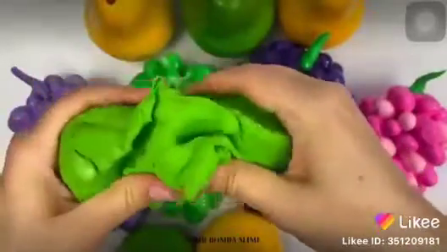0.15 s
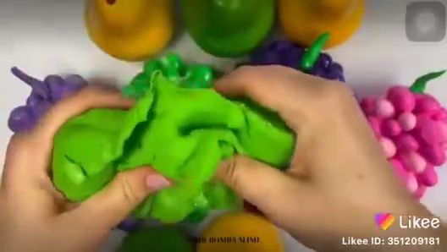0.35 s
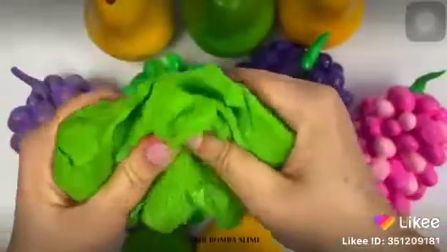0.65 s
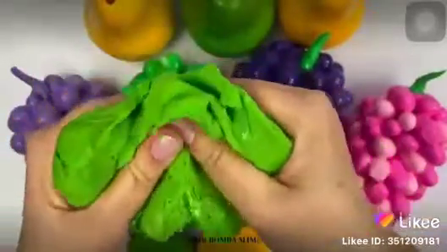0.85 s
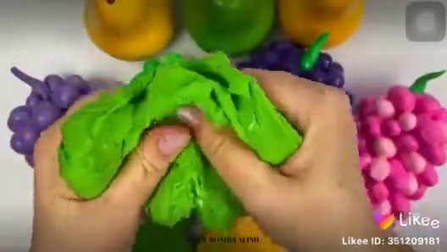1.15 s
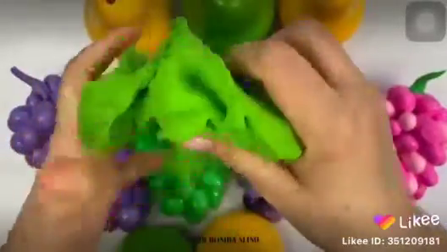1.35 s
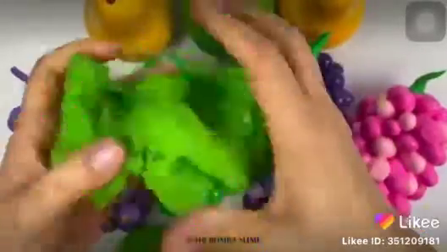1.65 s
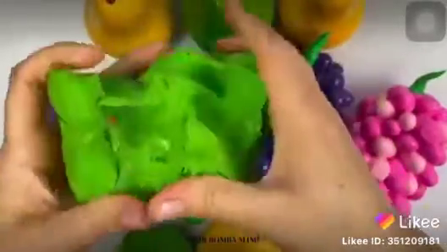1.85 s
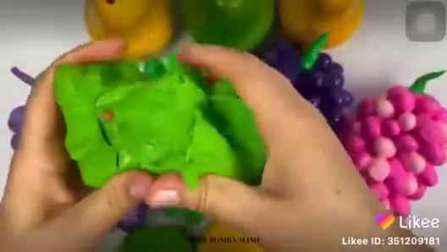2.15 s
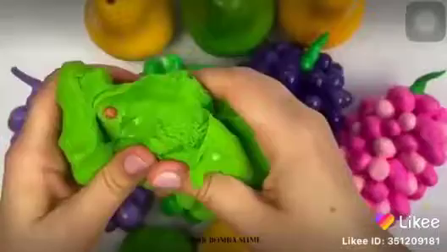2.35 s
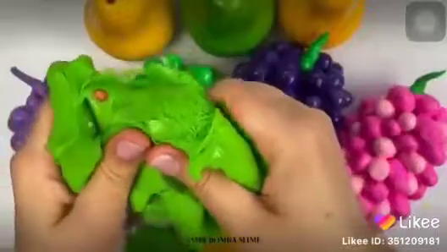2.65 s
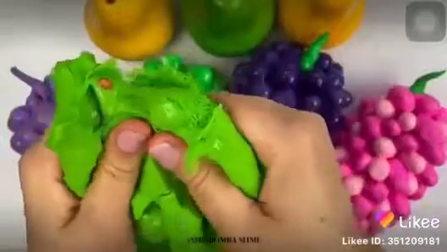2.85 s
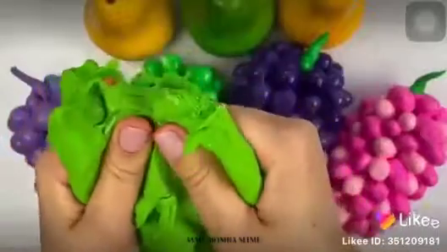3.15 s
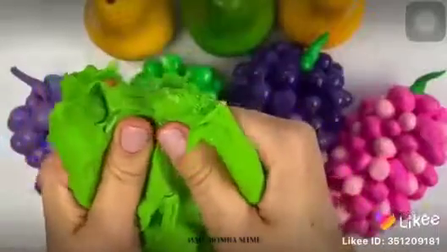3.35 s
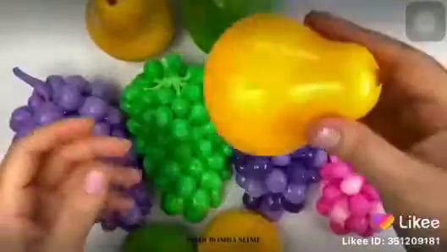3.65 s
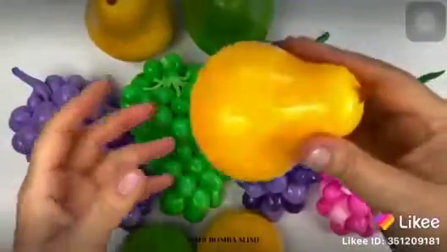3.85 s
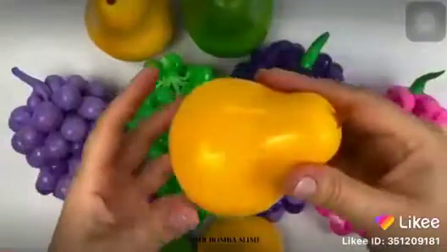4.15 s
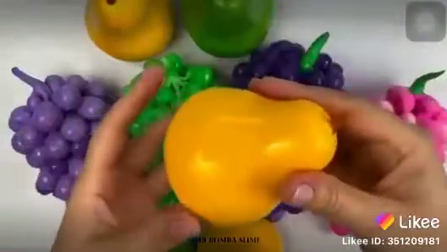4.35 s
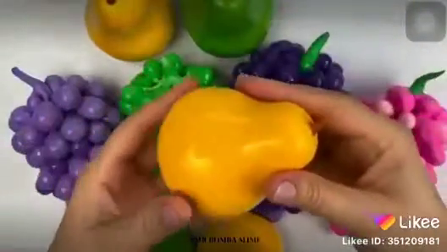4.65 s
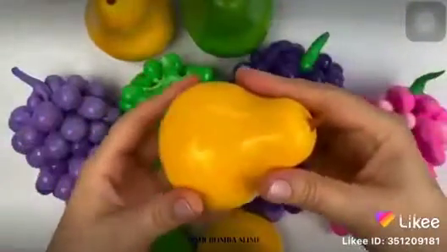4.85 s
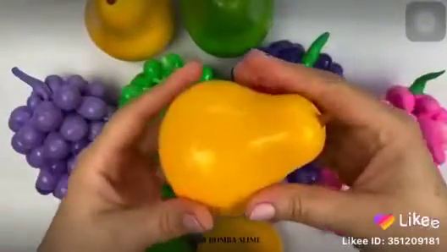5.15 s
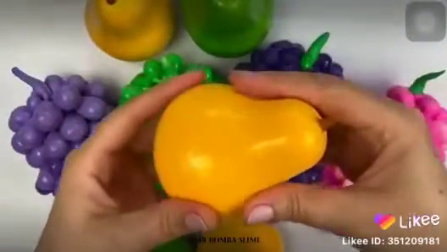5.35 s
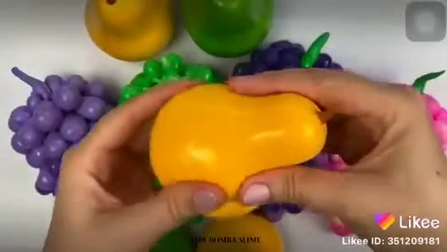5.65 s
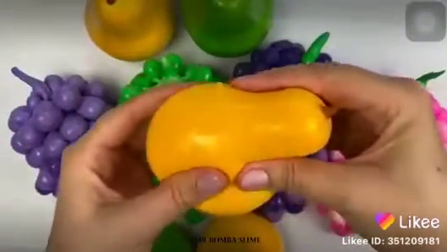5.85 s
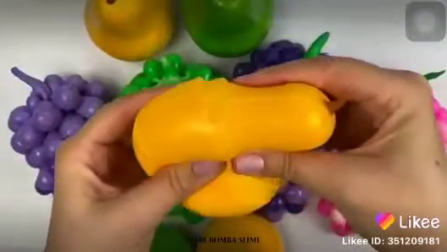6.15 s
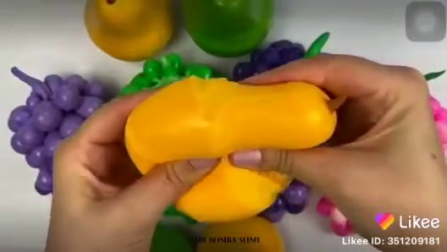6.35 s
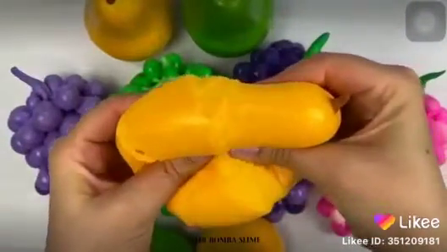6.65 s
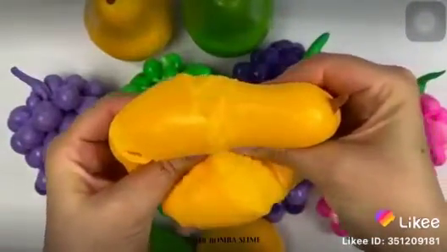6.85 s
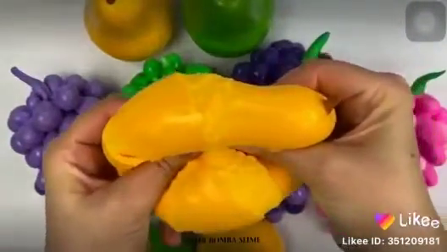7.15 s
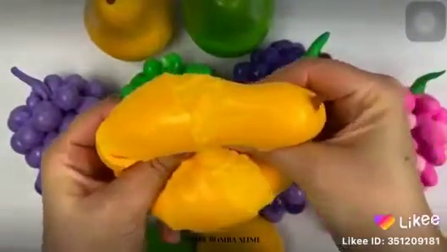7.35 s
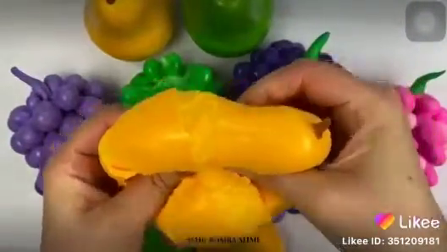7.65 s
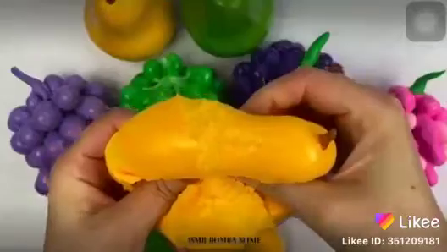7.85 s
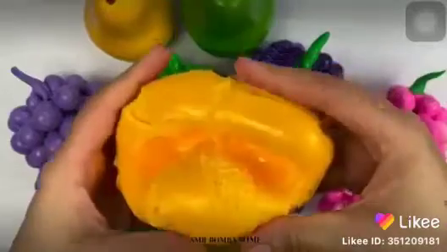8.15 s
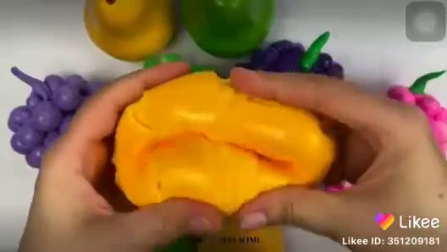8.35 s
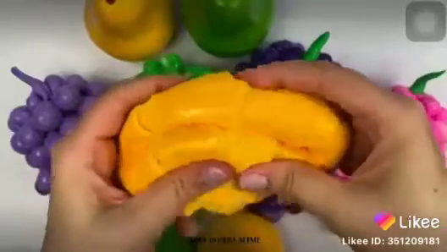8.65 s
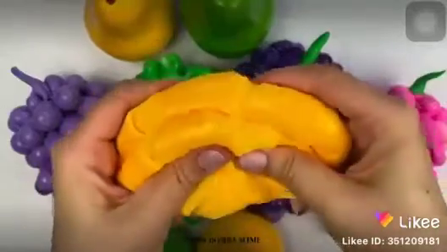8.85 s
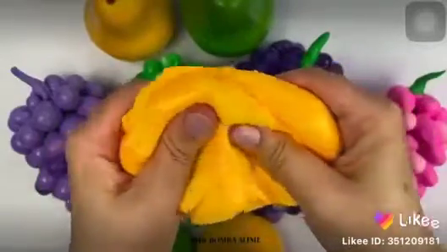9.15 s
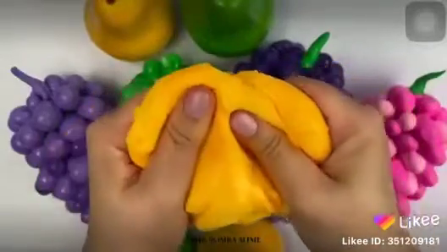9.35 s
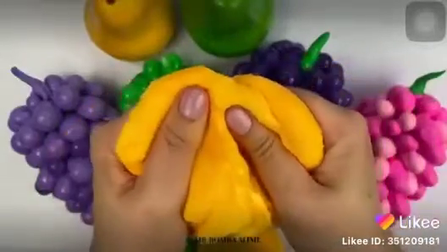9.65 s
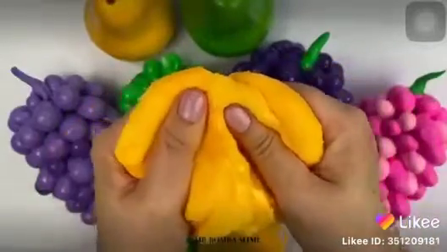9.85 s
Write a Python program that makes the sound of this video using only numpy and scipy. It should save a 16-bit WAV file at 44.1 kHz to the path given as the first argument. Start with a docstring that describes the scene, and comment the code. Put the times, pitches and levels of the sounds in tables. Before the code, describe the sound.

Crisp crust fractures, bright and dry, pop in irregular clusters over gritty rustling as fingers press into clay. Two early bursts are separated by dull regripping; then over two seconds of near silence with only room noise and faint low pulses. The loudest crunching follows, slightly clipped, then sparse ticks, then a last heavy crackling run that fades. Close, dry, indoor phone pickup.

```python
"""Hands squeeze soft clay under a hard, brittle crust, close to a phone microphone in a quiet room.
Two bursts of crust snaps over fine crackle come first, with bass rumble and soft bumps of handling.
From 3.3 s comes a lull as a new shape is fetched; from 5.6 s its snaps are loudest and overload the input.
A last burst from 8.2 s has two low clay groans. Low swells of alternating sign come in three runs; faint
room noise lies under it all. Snaps and crackle are noise bursts driving resonant modes."""
import sys
import numpy as np
from scipy import signal
from scipy.fft import rfft, irfft
from scipy.io import wavfile
from scipy.ndimage import uniform_filter1d

SR = 44100
rng = np.random.default_rng(int(sys.argv[2]) if len(sys.argv) > 2 else 0)


def store_pcm(level_fs):
    """Save levels as 16-bit WAV."""
    pcm = np.round(np.clip(level_fs, -1, 1) * 32767).astype(np.int16)
    wavfile.write(sys.argv[1], SR, np.atleast_2d(pcm).T)


N = 441000


def amp(db):
    """dB to gain."""
    return 10 ** (np.asarray(db) / 20)


def rms_one(x):
    """Scale to rms 1."""
    return x / np.sqrt(np.mean(x ** 2) + 1e-20)


def ring(x, hz, t60_s):
    """Two-pole resonator: a unit click rings as a decaying sine of height 1."""
    radius = amp(-60 / (t60_s * SR))
    w = 2 * np.pi * hz / SR
    return signal.lfilter([0, np.sin(w)], [1, -2 * radius * np.cos(w), radius ** 2], x + 1e-18)


def band(x, low_hz, high_hz):
    """Butterworth band-pass."""
    sos = signal.butter(2, [low_hz, high_hz], "band", fs=SR, output="sos")
    return signal.sosfilt(sos, x)


def drift(rate_hz):
    """Slow random wander of rms 1: noise through two equal low-pass poles."""
    pole = np.exp(-2 * np.pi * rate_hz / SR)
    noise = rng.standard_normal(N + SR)
    settled = signal.lfilter([1], [1, -2 * pole, pole ** 2], noise)[SR:]
    return rms_one(settled)


NEW_SHAPE_S = 4.0   # lump before, hollow shape after
RUN_TAU_S = 0.0045


def strike(at, sizes, modes, spread_db, tear_s, run_on=0):
    """Each fracture is a decaying noise burst, may run on longer, and drives each mode by its own random gain."""
    out, t = np.zeros(N), np.arange(900) / SR
    tear, run = [np.exp(-t / tau_s) / np.sqrt(tau_s * SR / 2) for tau_s in (tear_s, RUN_TAU_S)]
    luck = rng.standard_normal((len(at), len(modes)))
    on_lump = at < NEW_SHAPE_S * SR
    for (hz, lump_db, hollow_db, t60_s), own in zip(modes, luck.T):
        size = sizes * amp(np.where(on_lump, lump_db, hollow_db) + spread_db * own)
        if hz < 800:   # only long cracks move the whole body
            size = size * np.minimum(run_on, 1) ** 0.48
        starts = np.zeros((2, N))
        np.add.at(starts, (slice(None), at), [size, size * run_on])
        push = signal.oaconvolve(starts, [tear, run], axes=1)[:, :N].sum(0)
        out += ring(push * rng.standard_normal(N), hz, t60_s)
    return out


# crust fractures: [t/s, splinter drive level/dB, shell drive level/dB], relative to the modes
FRACTURES = [(0.0783, -18, -41), (0.105, -9, -33),  (0.1523, -26, -26), (0.191, -23.5, -40),
             (0.2031, -14.5, -36), (0.2452, -15.5, -21), (0.254, -4, -7), (0.2747, -13, -22),
              (0.3098, -17, -18), (0.3232, -10, -10.5), (0.345, -12.5, -17),  (0.361, -9, -16.5),
             (0.3733, -8.5, -12), (0.394, -12, -25), (0.3987, -3, -10), (0.413, -10, -36),
              (0.445, -22, -39), (0.4682, -17, -23.5),  (0.541, -11, -14.5),  (0.5536, -16, -40),
             (0.5693, -16.5, -19), (0.593, -11, -29),  (0.6213, 2.5, -18),  (0.6429, -17, -17.5),
             (0.6609, -12, -12), (0.6814, -16, -18.5), (0.7405, -25, -23), (0.755, -29, -37),
             (0.786, -30, -26), (0.796, -21, -37), (0.8157, -21.5, -45),  (0.8387, -28, -26.5),
             (0.8748, -20.5, -16.5), (0.905, -15.5, -41),  (0.9255, -23.5, -29), (0.9642, -22, -23),
              (0.988, -29, -45), (1.0032, -11.5, -23.5), (1.055, -27, -31), (1.219, -16.5, -23),
             (1.257, -40, -26), (1.268, -32, -11), (1.2738, -39, -10.5), (1.2953, -42, -18.5),
             (1.5409, -46, -25), (1.741, -26.5, -37), (1.829, -42, -29.5), (1.996, -44, -38),
             (2.018, -38, -31), (2.054, -31, -28), (2.067, -33, -22), (2.17, -27.5, -36),
             (2.2826, -25.5, -36), (2.3115, -3, -18), (2.3449, -19.5, -39), (2.4076, -19.5, -49),
             (2.43, -22, -40), (2.4545, -12, -29), (2.5032, -25, -45), (2.509, -18.5, -42),
             (2.5356, -14, -30), (2.5682, -9, -20), (2.592, -9, -22), (2.6216, -9, -9.5),
              (2.6805, -12, -21),  (2.6989, -8, -14), (2.7415, -21, -32), (2.7758, -13, -14),
             (2.7911, -19, -23), (2.9022, -16, -23), (2.922, -13, -20),  (2.9345, -22, -39),
             (2.9705, -8.5, -12), (2.9999, -20.5, -24), (3.0444, -14, -20.5), (3.0514, -22, -17),
             (3.0686, -17.5, -36), (3.112, -20, -22.5), (3.121, -23, -37), (3.175, -18, -21.5),
              (3.1873, -26, -32), (3.2615, -35, -28.5), (4.24, -48, -60), (4.3975, -44, -38.5),
             (4.713, -53, -38.5), (4.903, -35, -39), (4.9189, -36, -34), (4.987, -66, -41),
             (5.6247, -17, -40), (5.6686, 0, 1.5), (5.6935, 0, -46), (5.7101, -4, 11.5), (5.7237, 3, -14),
             (5.7299, 0, 1), (5.7468, -7, -1.5), (5.7518, 2.5, -22), (5.7758, -10, -13),
             (5.7979, -4.5, -7.5),  (5.825, -6, -6.5), (5.8459, -7, -3.5),  (5.859, -0.5, -5),
             (5.874, -6, -9), (5.8995, -9, -12), (5.921, -5, -9.5), (5.9327, -3, -11), (5.95, -2, -11.5),
             (5.963, -2, -3), (5.9772, 2, -2.5), (5.9955, 6, -29), (6.0106, 0, -3.5), (6.07, -9, -10),
             (6.0792, -2.5, -5), (6.096, -1, -14.5),  (6.1356, -17, -11), (6.144, 2, -9.5),
             (6.1822, -5, -5.5), (6.194, 1.5, -4),  (6.248, -4.5, -8), (6.2632, -3.5, -5.5),
             (6.2839, -2, -6.5),  (6.3237, -9, -9), (6.3557, -8, -8.5), (6.3632, -6.5, -5.5),
             (6.3768, -6, -6.5), (6.3896, -2, -17), (6.4226, -6, -4), (6.43, -4.5, -9),  (6.4858, -32, -13),
             (6.5013, -20, -22),  (6.5408, -6, -8.5), (6.5702, -17, -24), (6.5776, -11.5, -21),
             (6.636, -22, -36), (6.6627, -12.5, -16.5), (6.691, -4.5, -8.5), (6.719, -5, -5.5),
             (6.7487, -6.5, -11.5),  (6.7778, -13, -11), (6.802, -2, -7.5),  (6.853, -2.5, -10.5),
             (6.9084, -22, -23), (6.926, -8, -10),  (6.9566, -16.5, -31), (6.9868, -15, -21),
             (7.0026, -14, -9), (7.0119, -6, -11), (7.032, -8.5, -14),  (7.0524, -30, -42),
             (7.1234, -17.5, -31), (7.1781, -15, -13.5), (7.413, -26, -24), (7.5244, -20, -26),
              (7.5477, -24, -24), (7.5686, -21, -26), (7.614, -24.5, -23.5), (7.7408, -19.5, -45.5),
             (7.8086, -26, -23), (8.1887, -31, -64), (8.2246, -27.5, -53), (8.2839, -16.5, -20.5),
             (8.3301, -21.5, -47), (8.397, -24, -32), (8.4793, -14, -10.5), (8.4915, -15, -22),
             (8.5055, -8, -12),  (8.515, -15, -12.5), (8.523, -11, -13), (8.5583, -11, -8),
             (8.5667, -3.5, -10.5), (8.588, -13, -21), (8.5966, -9, -12),  (8.6374, -27, -12),
             (8.6676, -9.5, -8), (8.6864, -7.5, -8.5), (8.7019, -12, -15),  (8.7265, -20, -9.5),
             (8.7606, 1, -10),  (8.7859, -4, -8), (8.798, -2, -17), (8.809, -7, -8.5), (8.8324, -8, -26),
              (8.8816, -6.5, -13), (8.9103, 1, -15), (8.9384, -3.5, -7), (8.9538, -7, -8.5),
             (8.979, -16, -26), (9.0087, -16, -24), (9.025, -24, -12), (9.0481, -18, -7.5), (9.08, 4, -26),
             (9.1165, -8, -3.5), (9.1366, -4, -5.5), (9.1456, 4, -33),  (9.163, -3, -16), (9.186, -10, -21),
             (9.2038, -16, -21), (9.2199, -14, -32), (9.241, -14, -37), (9.2648, -13.5, -27),
              (9.2813, -15, -22), (9.3462, -12, -13.5),  (9.3787, -18, -28), (9.3856, -13, -41),
             (9.423, -15.5, -19), (9.4418, -10, -19), (9.4533, -7.5, -37), (9.489, -20, -26),
             (9.5062, -6, -17),  (9.5362, -16.5, -34),  (9.5621, -18, -37), (9.5736, -15, -28),
             (9.5984, -8.5, -30), (9.6371, -15, -22), (9.672, -12.5, -30),  (9.6899, -19, -48),
             (9.699, -12.5, -32), (9.765, -30, -47), (9.9588, -21.5, -34)]
# splinter modes: [f/Hz, relative level on lump/dB, on hollow shape/dB, t60/s]
SPLINTER_MODES = [(2835, -5.5, -6.5, 0.0047), (3465, -5.5, -5.5, 0.0035), (4310, -3, -4, 0.0025),
                  (5460, -2.5, -4.5, 0.0017), (6490, -3.5, -4, 0.0026), (7430, 0, 0, 0.0019),
                  (8900, -2, -2.5, 0.0013), (10000, -13, -29, 0.0012), (12450, -5.5, -1, 0.00063),
                  (14360, -13, -10, 0.0021)]
# clay body modes: [f/Hz, relative level on lump/dB, on hollow shape/dB, t60/s]
SHELL_MODES = [(312, -47, -22, 0.028), (709.6, -22, -13, 0.031), (1065, -14, -11.5, 0.017),
               (1324, -11, -5.5, 0.016), (1754, -0.5, -2.5, 0.0077), (2115, 2, 2, 0.0061),
               (2480, -6.5, -8, 0.012)]


def snaps():
    """Large fractures: bright splinters plus shell ring; the stronger the shell drive, the more run-on, to a limit."""
    s, splinter_db, shell_db = np.transpose(FRACTURES)
    at = (s * SR).astype(int)
    run_on = np.minimum(amp(0.98 * shell_db + 1.0), 1.5)
    splinters = strike(at, amp(splinter_db), SPLINTER_MODES, spread_db=2.5, tear_s=0.0006, run_on=run_on)
    shell = strike(at, amp(shell_db - 3), SHELL_MODES, spread_db=2.0, tear_s=0.00092, run_on=run_on)
    return splinters + shell


WAKE_TAU_S, WAKE_SHARE, WAKE_LIMIT_DB = 0.025, 0.42, 6


def wake():
    """Small fractures follow large ones: dB offset from recent snapping against its running mean."""
    s, splinter_db, shell_db = np.transpose(FRACTURES)
    jolts = np.zeros(N)
    jolts[(s * SR).astype(int)] = amp(splinter_db) + amp(shell_db)
    recent = signal.lfilter([1], [1, -np.exp(-1 / (WAKE_TAU_S * SR))], jolts + 1e-12)
    over_db = 20 * np.log10(recent / uniform_filter1d(recent, size=SR // 2))
    return np.clip(WAKE_SHARE * over_db, -WAKE_LIMIT_DB, WAKE_LIMIT_DB)


LET_GO_DB_PER_S, SAG_EXPONENT = 250, 1.96
# thumbs press the crust: [start t/s, hardest t/s, let-go t/s, base crackle level at hardest/dB, at let-go/dB]
THUMB_PRESSES = [(-0.3, 0.396, 1.025, -40, -55.5), (2.19, 2.576, 3.25, -43.5, -59),
                 (5.67, 5.855, 7.19, -25, -42), (8.37, 8.73, 9.72, -28.5, -48.5)]


def pressure():
    """Base fine crackle in dB: builds up, sags as the crust gives way, falls fast when the thumbs let go."""
    t, out = np.arange(N) / SR, 1e-6
    for start_s, hard_s, end_s, hard_db, end_db in THUMB_PRESSES:
        build = np.clip((t - start_s) / (hard_s - start_s), 0, 1)
        sag = np.clip((t - hard_s) / (end_s - hard_s), 0, 1) ** SAG_EXPONENT
        let_go_db = LET_GO_DB_PER_S * np.maximum(t - end_s, 0)
        out = out + build * amp(hard_db + (end_db - hard_db) * sag - let_go_db)
    return 20 * np.log10(out)


def crackle(level_db, regrip, clumps, modes, per_s, uneven_db, rub_db, rub_top_db):
    """Tiny fractures in clumps over skin rubbing on clay, which grows only up to a point."""
    at = np.flatnonzero(rng.random(N) < per_s * amp(6.0 * clumps) / SR)
    sizes = amp(uneven_db * np.minimum(rng.exponential(1, N), 4)[at])
    grains = rms_one(strike(at, sizes, modes, spread_db=2.0, tear_s=0.00054))
    # rubbing: noise through the lump's modes, damped to a quarter of t60
    rub = rms_one(sum(amp(1.2 * lump_db) * ring(rng.standard_normal(N), hz, t60_s / 4)
                      for hz, lump_db, _, t60_s in modes))
    capped_db = np.minimum(level_db, rub_top_db + 18 * regrip)
    rubbing_db = capped_db + rub_db + 4.34 * regrip + 4.0 * clumps
    return amp(level_db - 3.8 * regrip) * grains + amp(rubbing_db) * rub


SHIFT_RISE_SHARE = 0.85   # rise time constant / length
HANDS_EMPTY_S = (3.33, 5.5)   # clay put down, next shape barely touched
HELD_DB, IDLE_DB = (-61.5, -67, -47.5), (-73, -83, -50)   # base [fine, dull, rumble]
# grip shifts: [peak t/s, length/s, base level/dB of fine rustle, of dull rustle, of rumble]
GRIP_SHIFTS = [(0.0, 0.054, -40.5, -60, -36), (1.222, 0.031, -35, -35, -37),
               (1.277, 0.044, -34, -26.5, -27.5), (1.407, 0.052, -44, -46, -55),
               (1.556, 0.052, -52.5, -40.5, -36.5), (1.74, 0.032, -51, -47, -39),
               (1.831, 0.018, -59, -47.5, -50), (2.064, 0.07, -47, -44.5, -32.5),
               (2.19, 0.15, -48.5, -56, -42.5), (4.41, 0.036, -72, -70, -48), (7.46, 0.034, -45, -47, -55),
               (7.54, 0.078, -41.5, -39.5, -52), (7.651, 0.09, -47.5, -47.5, -52),
               (7.929, 0.075, -45.5, -46, -48), (8.133, 0.08, -67, -67, -47), (8.325, 0.13, -48, -72, -57),
               (9.39, 0.11, -48, -55, -37.5), (9.73, 0.13, -52, -50, -41), (9.99, 0.099, -42, -53, -47)]


def shifting():
    """Base power of fine rustle, dull rustle, rumble: grip shifts swell fast and trail off over quiet holding."""
    t = np.arange(N) / SR
    is_empty = (t > HANDS_EMPTY_S[0]) & (t < HANDS_EMPTY_S[1])
    empty = uniform_filter1d(1. * is_empty, size=SR // 8)
    power = amp(np.outer(HELD_DB, 1 - empty) + np.outer(IDLE_DB, empty)) ** 2
    for s, length_s, *level_db in GRIP_SHIFTS:
        u = (t - s) / length_s
        shape = np.exp(np.minimum(u, 0) / SHIFT_RISE_SHARE) / (1 + np.maximum(u, 0)) ** 2
        power = power + np.outer(amp(level_db), shape) ** 2
    return power


# bumps of hands and clay: [t/s, envelope peak level/dB, f/Hz]
SOFT_BUMPS = [(1.25, -22, 32.7), (1.299, -21, 32), (1.549, -25.5, 48.7), (2.07, -27, 59.2),
              (2.1, -23, 59.2), (4.389, -30, 37), (4.716, -37, 48.4), (4.898, -33, 47.8), (8.089, -30, 32),
              (9.6, -30.5, 121), (9.66, -31, 126)]


def handling(rumble_db):
    """Moving hands: low noise of wandering level, plus bumps as sines under a half-Gaussian decay."""
    rumble = rms_one(band(rng.standard_normal(N), 12.6, 114.0))
    out = amp(rumble_db + 0.89 * drift(4.2)) * rumble
    t = np.arange(SR // 8) / SR
    for s, peak_db, hz in SOFT_BUMPS:
        i = round(s * SR)
        decay = np.exp(-(t * hz / 1.5) ** 2)
        out[i:i + len(t)] += amp(peak_db) * np.sin(2 * np.pi * hz * t) * decay
    return out


# soft clay groans as it gives way: [start t/s, end t/s, first f/Hz, last f/Hz, fundamental level/dB]
CLAY_GROANS = [(8.365, 8.639, 72.7, 96.1, -38.5), (9.056, 9.362, 59.6, 46.1, -30)]


def groans():
    """Regular slips: a gliding stack of five harmonics."""
    out = np.zeros(N)
    for start_s, end_s, first_hz, last_hz, db in CLAY_GROANS:
        i, n = round(start_s * SR), round((end_s - start_s) * SR)
        phase = 2 * np.pi * np.cumsum(np.linspace(first_hz, last_hz, n)) / SR
        stack = sum(amp(-5.5 * k) * np.sin((k + 1) * phase) for k in range(5))
        out[i:i + n] += amp(db) * signal.windows.tukey(n, .6) * stack
    return out


SWELL_CYCLE_S, SWELL_UP_S = .842, .431   # up pulse follows down pulse by SWELL_UP_S
SWELL_PEAK_DB, SWELL_TAU_S = -26.5, 0.0076   # peak at 2 tau
# runs of low swells, down first: [first t/s, pulse count]
LOW_SWELLS = [(.333, 8), (3.652, 11), (8.034, 5)]


def swells():
    """One-sided low pulse, u^2 exp(-u), that flips its sign each time."""
    out = np.zeros(N)
    u = np.arange(SR // 8) / SR / SWELL_TAU_S
    pulse = amp(SWELL_PEAK_DB) * (u / 2) ** 2 * np.exp(2 - u)
    for first_s, count in LOW_SWELLS:
        for k in range(int(count)):
            i = round((first_s + k // 2 * SWELL_CYCLE_S + k % 2 * SWELL_UP_S) * SR)
            out[i:i + len(u)] -= (-1) ** k * pulse
    return out


ROOM_T60_S, ROOM_DB = 0.092, -15


def room(x):
    """Dense reflections off table and walls: convolution with decaying noise of unit energy."""
    t = np.arange(SR // 3) / SR
    tail = rng.standard_normal(len(t)) * amp(-60 * t / ROOM_T60_S) * (t > .002)
    tail = band(tail, 187, 17000)
    return signal.oaconvolve(x, tail / np.linalg.norm(tail))[:N]


AIR_RMS_DB = -58.5   # within 200-15500 Hz
# air and microphone noise spectrum: [f/Hz, relative density level/dB]
AIR_SPECTRUM = [(24, -8), (40, 10.5), (114, -13), (333, -15.5), (461, -7.5), (591, -19.5), (653, -18.5),
                (722, -15.5), (1080, -19.5), (4130, -28), (15500, -31)]
# narrow noise bands in the room tone: [f/Hz, width/Hz, rms level/dB]
HUM_BANDS = [(491.4, 12, -71), (657.4, 42, -63)]


def room_tone():
    """Steady air and microphone noise, spectrally shaped, with two faint narrow bands."""
    hz, table = np.fft.rfftfreq(N, 1 / SR) + 1, np.array(AIR_SPECTRUM)
    shape_db = np.interp(np.log(hz), np.log(table[:, 0]), table[:, 1])
    air = irfft(rfft(rng.standard_normal(N)) * amp(shape_db), N)
    air /= np.std(band(air, 200, 15500))
    hum = sum(amp(db) * rms_one(band(rng.standard_normal(N), f - width / 2, f + width / 2))
              for f, width, db in HUM_BANDS)
    return amp(AIR_RMS_DB) * air + hum


# fine level LOUD_DB pairs with these dull and rumble levels; dull rises more steeply
LOUD_DB, DULL_AT_LOUD_DB, RUMBLE_AT_LOUD_DB = -26, -29, -43.5
DULL_PER_FINE, RUMBLE_PER_FINE = 1.15, 1   # dB per dB


def scene():
    """Crust, hands and room at the microphone; press and grip powers add."""
    over_db, clumps, wake_db = pressure() - LOUD_DB, drift(45), wake()
    pressed_db = [LOUD_DB + over_db + wake_db,
                  DULL_AT_LOUD_DB + DULL_PER_FINE * over_db + wake_db,
                  RUMBLE_AT_LOUD_DB + RUMBLE_PER_FINE * over_db]
    pressed = amp(pressed_db) ** 2
    total = pressed + shifting()
    fine_db, dull_db, rumble_db = 10 * np.log10(total)
    regrip = 1 - pressed[0] / total[0]   # grip-shift share of fine power
    fine = crackle(fine_db, regrip, clumps, SPLINTER_MODES,
                   per_s=170, uneven_db=5.5, rub_db=-4.5, rub_top_db=-31.5)
    dull = crackle(dull_db, regrip, clumps, SHELL_MODES[2:],
                   per_s=200, uneven_db=5.0, rub_db=-6.5, rub_top_db=-54)
    crust = snaps() + fine + dull
    hands = handling(rumble_db) + groans()
    return (crust + amp(ROOM_DB) * room(crust) + hands + swells() + room_tone())[None]


OVERLOAD, CUTOFF_HZ = .33, 16500   # OVERLOAD: full-scale ceiling


def record(dry):
    """Input overload flattens loud peaks hard; a steep zero-phase low-pass cuts the top."""
    flat = dry / (1 + np.abs(dry / OVERLOAD) ** 5) ** .2
    low_pass = signal.cheby2(10, 35, CUTOFF_HZ, fs=SR, output="sos")
    return signal.sosfiltfilt(low_pass, flat)


dry = scene()
out = record(dry)
store_pcm(out)
```